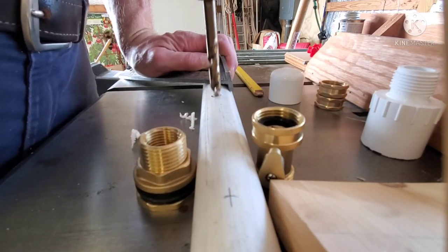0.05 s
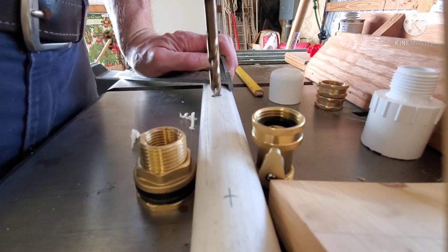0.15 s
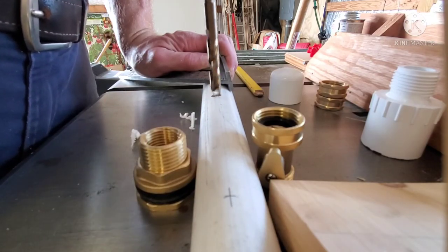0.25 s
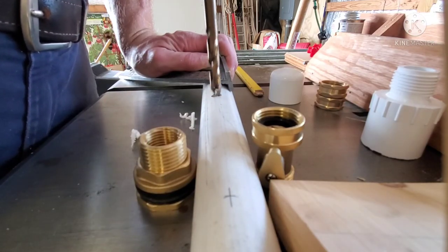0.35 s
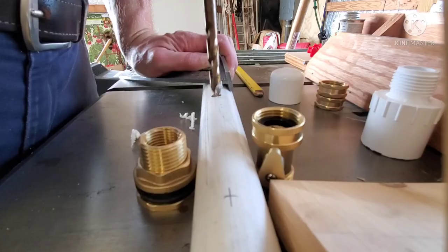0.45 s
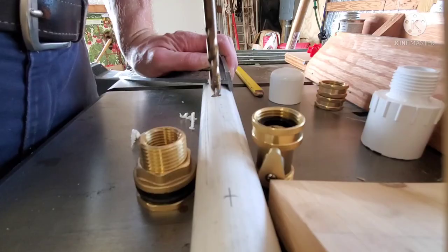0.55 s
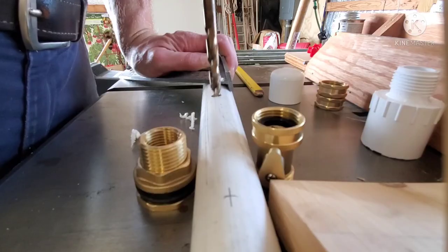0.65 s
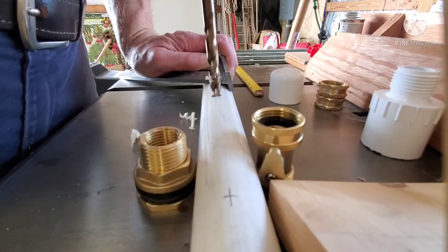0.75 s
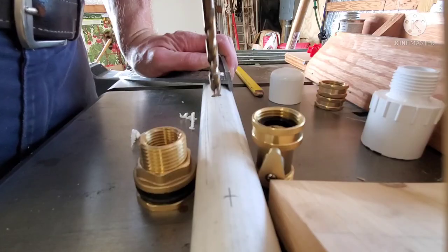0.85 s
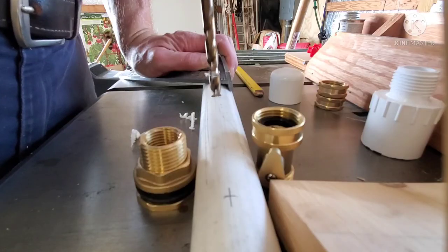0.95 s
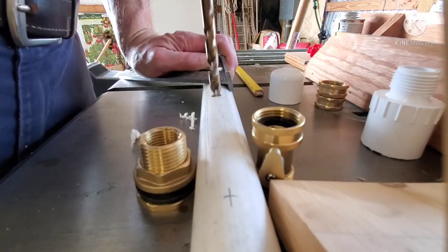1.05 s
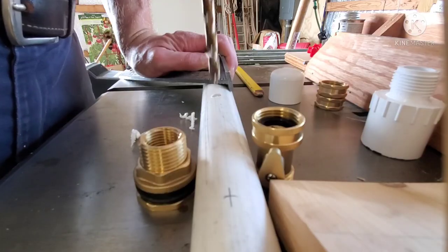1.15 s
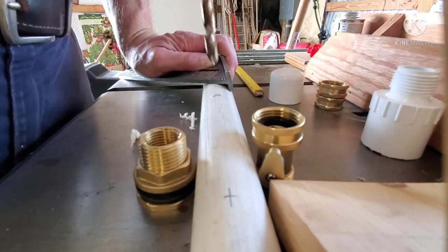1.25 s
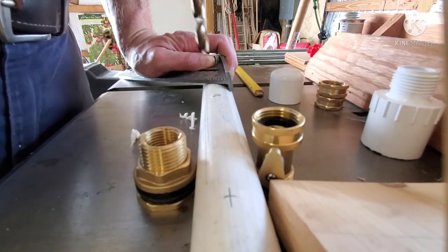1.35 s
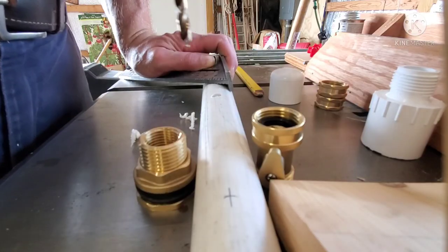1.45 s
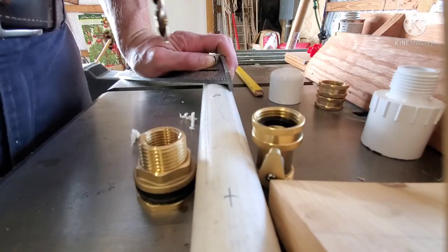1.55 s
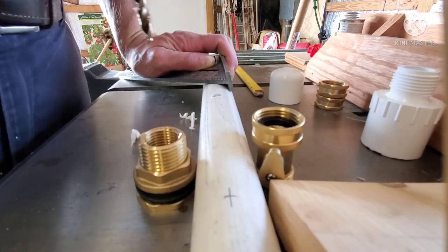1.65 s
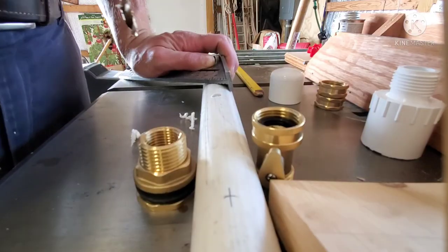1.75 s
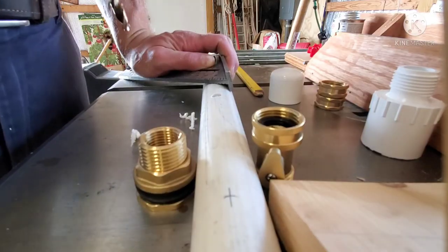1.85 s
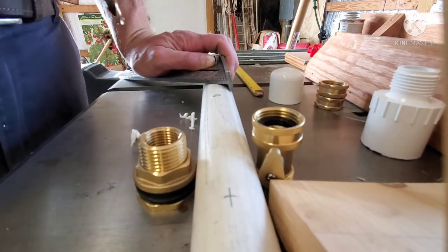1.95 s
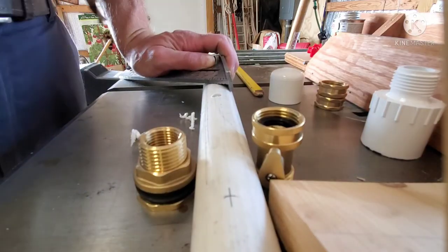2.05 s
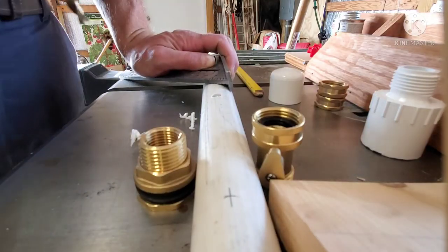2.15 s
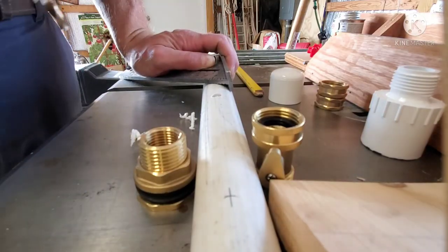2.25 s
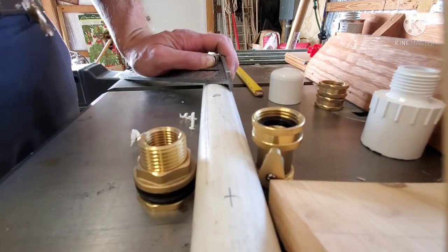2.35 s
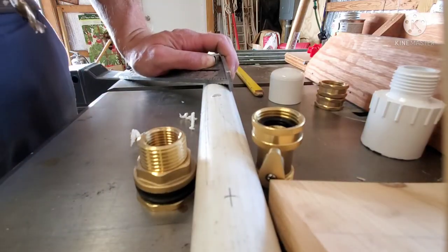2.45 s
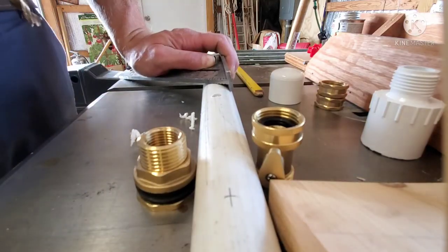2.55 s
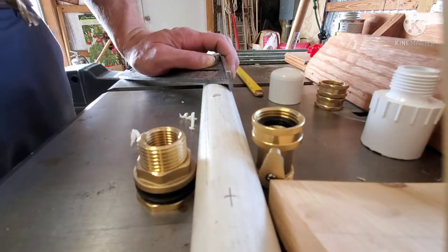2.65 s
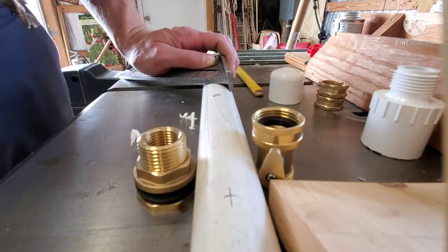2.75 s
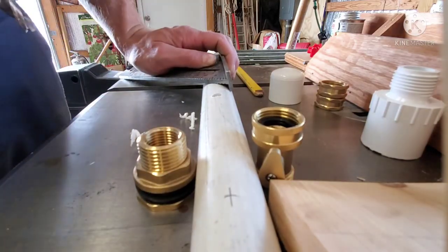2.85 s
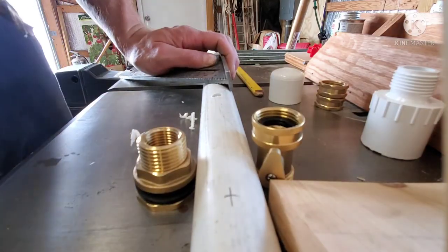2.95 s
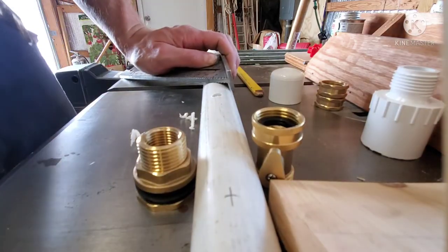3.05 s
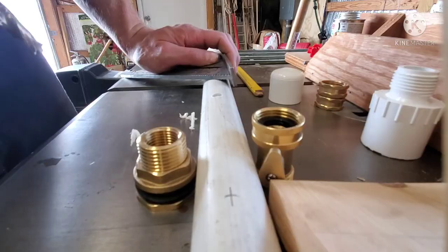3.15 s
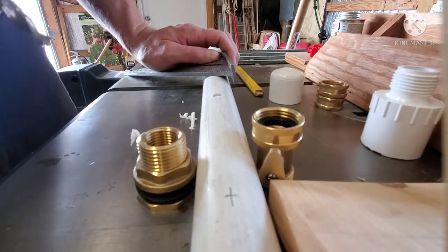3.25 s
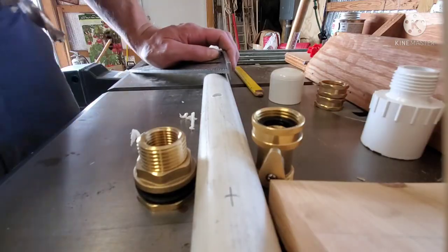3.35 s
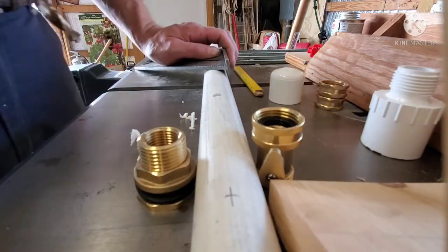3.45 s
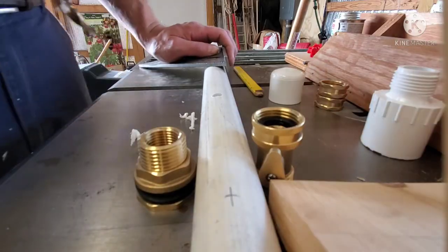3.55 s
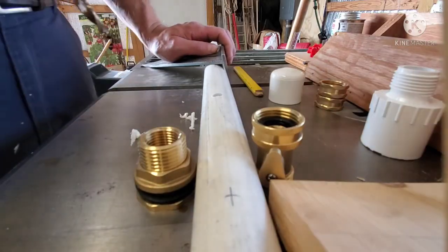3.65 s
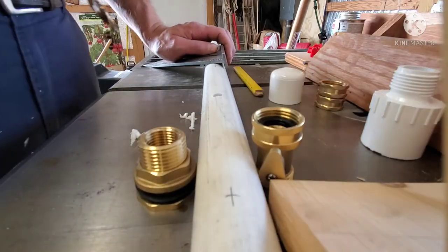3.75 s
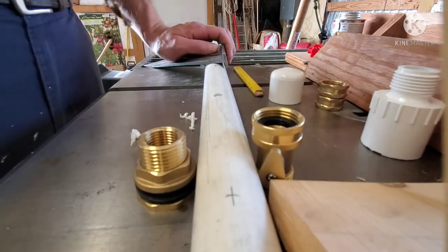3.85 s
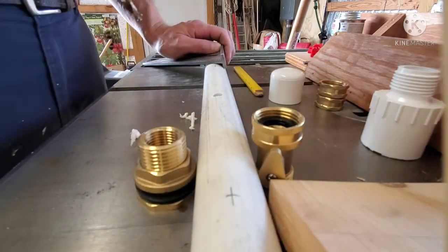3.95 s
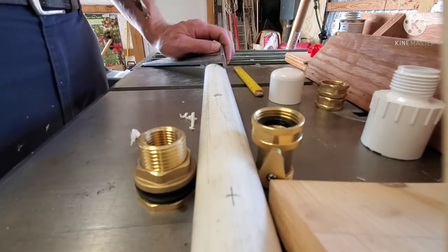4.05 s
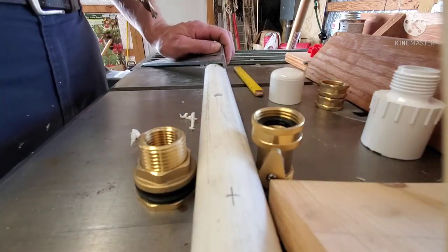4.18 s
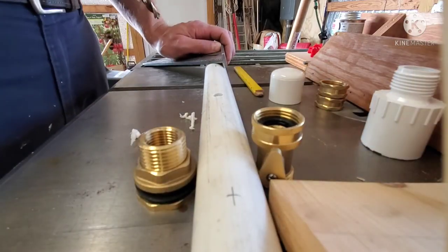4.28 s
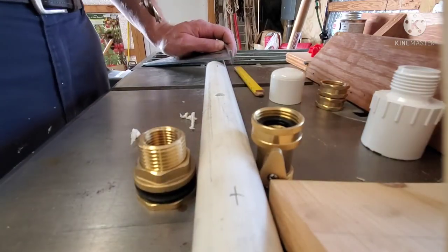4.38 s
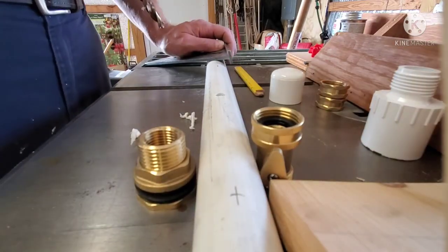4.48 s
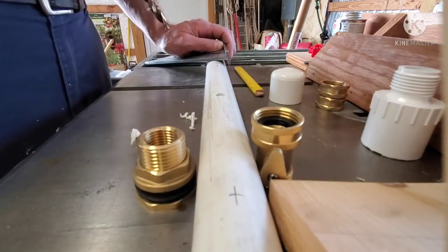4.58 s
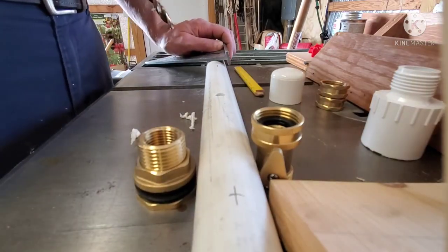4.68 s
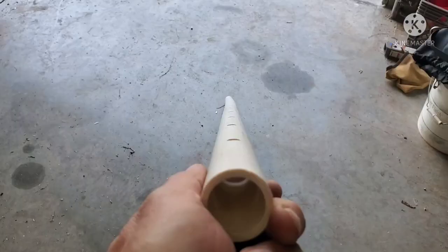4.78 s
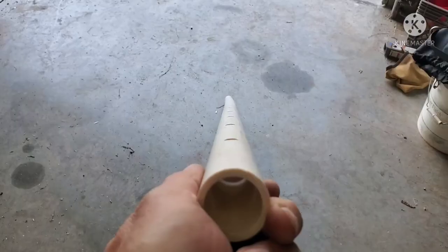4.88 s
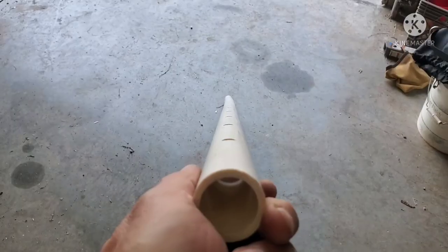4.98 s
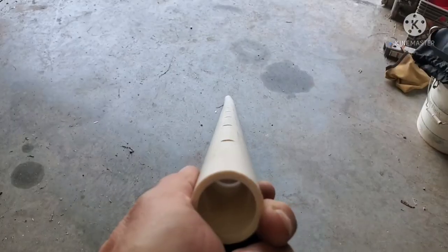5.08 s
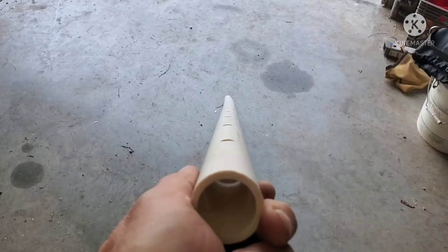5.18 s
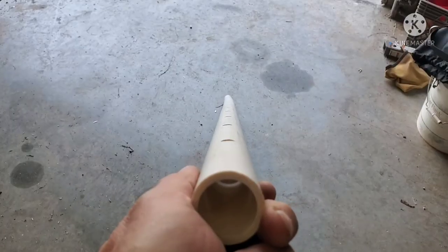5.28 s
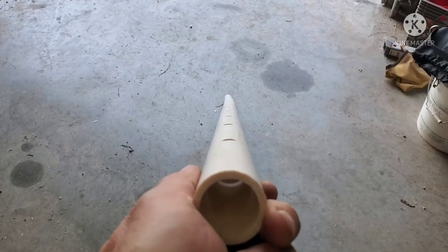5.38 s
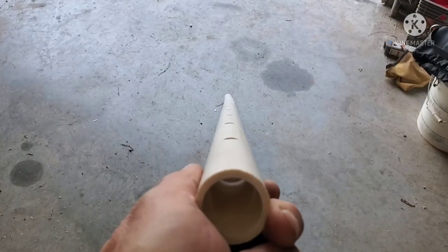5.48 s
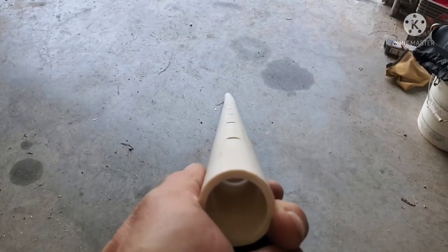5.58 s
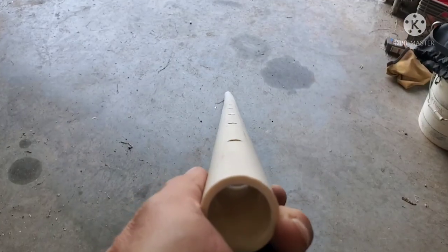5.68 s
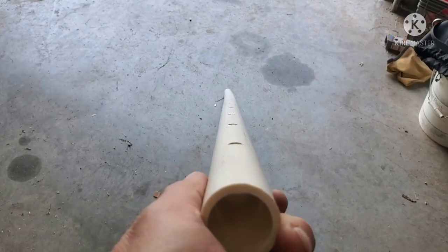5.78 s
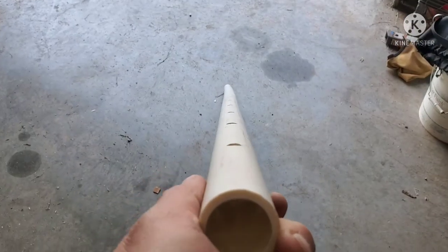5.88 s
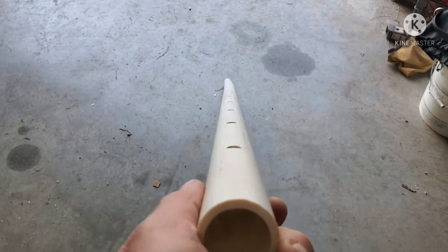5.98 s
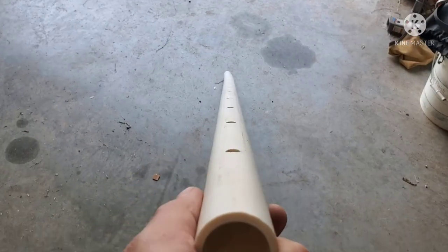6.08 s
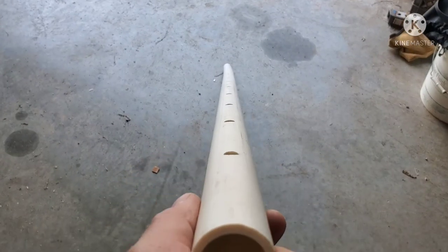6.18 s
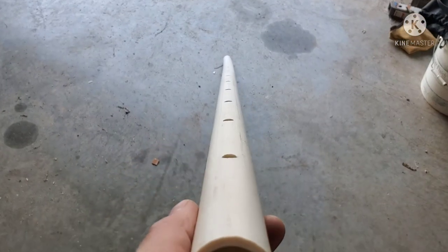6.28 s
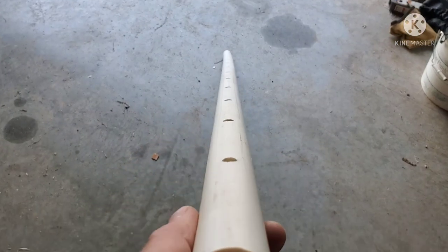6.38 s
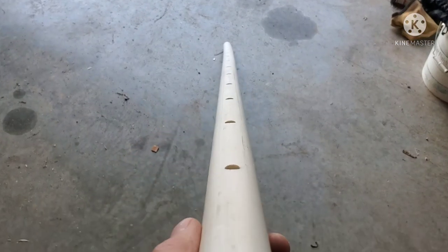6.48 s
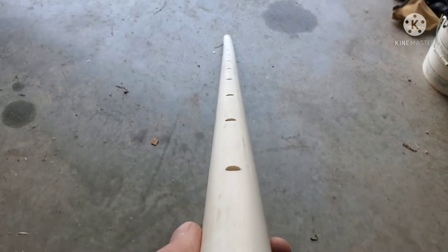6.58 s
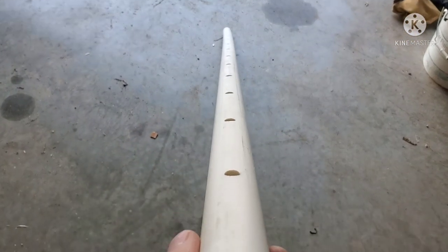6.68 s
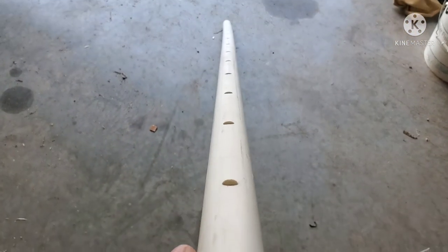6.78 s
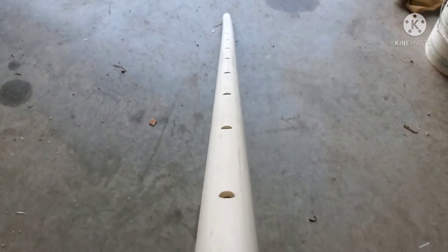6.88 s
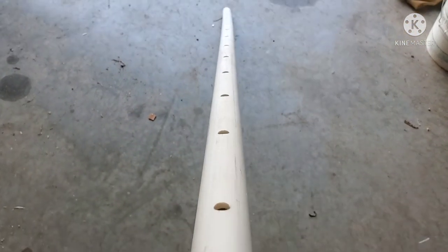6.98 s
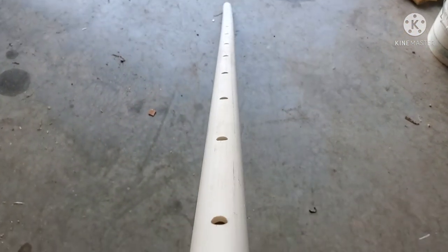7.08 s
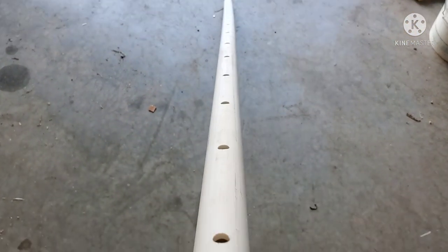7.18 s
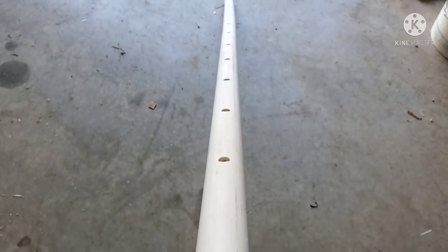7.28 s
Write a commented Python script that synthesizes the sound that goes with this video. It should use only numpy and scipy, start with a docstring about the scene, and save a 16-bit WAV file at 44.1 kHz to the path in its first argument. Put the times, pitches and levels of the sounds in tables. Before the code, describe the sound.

From the first instant a power drill is loud and close, slightly left: whining gears, rushing fan and a rough plastic rasp pulsing about ten times a second, its ringing growing as the bit digs in. Around 1.15 seconds it breaks through; the grinding vanishes and the motor runs freer and slightly higher. At 1.4 it brakes, pitch plunging, and snaps with a clack at 1.44, with short workshop reverberation. Near quiet follows: low hum, faint cloth rustle, very faint distant whistles. From 3.1 a scrape swells across the steel table, ending in a hard clack at 3.68 with metallic ringing and small rattles until 3.9. Soft knocks and hand rubs come at 4.1 to 4.65, then a cluster of hollow pipe knocks and scraping from 4.88. At 5.03 it cuts off abruptly to a quieter place: low hum, quick faint bird chirps mostly until 6.5, a barely audible bump at 6.65, and a light brush at 7.2.

```python
"""In a workshop, a hand drill bores a plastic pipe on a steel saw table, runs free and brakes with a clack.
Gear tones and fan noise follow the motor; noise pulsed once a turn of the chuck is the bit in the plastic.
A part scrapes across the table and clatters down, and the pipe is shifted with a few damped knocks.
The sounds of work break off at once, and a quieter place follows: a soft bump and brush of the pipe, a low hum.
Small birds outside whistle gliding notes, heard directly and by their echoes."""
import sys
import numpy as np
from scipy import signal
from scipy.fft import rfft, irfft, next_fast_len
from scipy.io import wavfile
from scipy.ndimage import map_coordinates

SR = 44100
rng = np.random.default_rng(int(sys.argv[2]) if len(sys.argv) > 2 else 0)


def wav_record(signal):
    """Record a signal, one row per channel, as 16-bit PCM in the file named by sys.argv[1]."""
    frames = np.transpose(np.atleast_2d(signal))
    bounded = np.clip(frames, -1, 1)
    # unit amplitude maps onto the largest positive 16-bit level
    quanta = np.round(bounded * 32767).astype(np.int16)
    wavfile.write(sys.argv[1], SR, quanta)


N = 323234
T = np.arange(N) / SR

# tones of the loaded gearbox: (multiple of shaft speed, relative level/dB at touch, the same once dug in)
GEAR_TONES = [(2, -52, -51), (4, -50, -49), (5, -64, -56), (7.5, -62, -53), (10, -57, -50.5),
              (12.5, -57, -45), (14, -55, -46.5), (15, -45, -35.5), (17.5, -57, -56), (20, -50, -45),
              (27, -53, -50), (27.5, -53, -51), (30, -37, -45.5), (32.5, -55, -51), (40, -52, -45),
              (42.5, -52, -42.5), (45, -54, -46), (47, -50, -43.5), (50, -56, -41.5), (60, -43, -40.5),
              (70, -51, -51), (80, -50, -48)]
# colour of the fan and brush noise: (f/Hz, relative density/dB)
FAN_COLOUR = [(35, -42), (60, -12.5), (102, -14.5), (135, -25.5), (167, -11), (206, -20), (343, -12.5),
              (403, -16.5), (509, -3), (559, -11.5), (889, -12.5), (1020, -3), (1290, -12.5), (1700, -0.5),
              (1910, -10.5), (2200, -3.5), (2410, -9), (3050, -9.5), (4630, -5), (5320, -12.5), (6710, -14),
              (7370, -18), (9510, -14.5), (13200, -14), (15500, -19)]
# colour of the bit shaving plastic: (f/Hz, relative density/dB)
CHIP_COLOUR = [(76, -49.5), (130, -14), (186, -3), (267, -12), (326, -9), (432, -16.5), (487, -10.5),
               (549, -17.5), (819, -7), (923, -10.5), (1220, -4.5), (1380, -10.5), (1620, -7), (1860, -12),
               (2180, -12.5), (2770, -8.5), (3600, -10), (4400, -12.5), (4860, -11), (6690, -18),
               (7540, -25), (9590, -17.5), (10400, -26), (13200, -16), (15500, -16.5)]
# resonances of drill and bit: (f/Hz, width/Hz, relative level/dB)
HOUSING_MODES = [(1260, 50, -12), (1820, 200, -9.5), (2170, 340, -8.5), (3200, 84, -6), (3464, 57, 0),
                 (3832, 120, -6.5), (4810, 160, -7), (5350, 130, -11.5), (5700, 180, -11.5),
                 (6600, 220, -9.5), (8260, 150, -18.5), (9540, 240, -18), (10300, 150, -18.5),
                 (11600, 350, -13.5), (12700, 330, -16.5), (13600, 260, -14), (14850, 230, -18.5)]
# likeness of the drill in left and right: (f/Hz, likeness -1 to 1)
DRILL_LIKENESS = [(60, 0.88), (130, -0.22), (290, -0.024), (640, -0.38), (1410, -0.44), (3100, -0.33),
                  (6820, 0.22), (15000, 0.079)]
# left-right balance of the drill: (f/Hz, left over right/dB)
DRILL_BALANCE = [(60, 1.8), (160, 5), (270, 8), (450, 2.5), (740, 2), (1220, 5), (1640, 1), (2100, 7),
                 (3300, 6), (4200, 6), (4900, 9), (6400, 11), (7600, 3), (10500, 1), (13500, 7), (15000, 6)]
# resonances of the locking chuck: (f/Hz, width/Hz, relative level/dB)
CHUCK_MODES = [(400, 260, 1), (1110, 320, 0), (2060, 290, 0), (3940, 340, -1)]
# the chuck snaps tight: (t/s, peak level/dB before panning, t60/s of the rattle)
CHUCK_SNAP = (1.4375, -12.5, 0.071)
# the bit breaks through, the trigger is let go, the chuck locks (s)
THROUGH_S, LET_GO_S, LOCK_S = 1.145, 1.38, 1.44
# gear shaft at first touch, while cutting and running free (turns a second)
START_SPEED, CUT_SPEED, FREE_SPEED = 79.6, 81.8, 86.5
# time the motor takes to settle at a new speed, and to brake (s)
SETTLE_S, BRAKE_S = .065, .078
# extra load at first touch, time to dig in, and how fast the load drops once the tip is through
TOUCH_DB, DIG_IN_S, UNLOAD_DB_PER_S = 0.5, 0.37, 216
# the bit rings more the deeper it sits
CHATTER_START_DB, CHATTER_FULL_DB, CHATTER_GROW_S = -13.5, -3, 0.65
# fan and brush noise, quieter under the brake
WHIR_FREE_DB, WHIR_LOADED_DB, WHIR_BRAKE_DB, RUN_DOWN_DB_PER_S = -28, -31, -6, 598
# gear whine, with its rise at first touch and under full braking
WHINE_FREE_DB, WHINE_LOADED_DB, WHINE_TOUCH_DB, WHINE_BRAKE_DB = -45.5, -46, 7, 11.5
# offset of the gearbox tones and depth of their flicker
GEAR_DB, GEAR_FLICKER_DB = -1.5, 3

# colour of the scrape: (f/Hz, relative density/dB)
SCRAPE_COLOUR = [(220, -47), (380, -14), (495, 0), (551, -16), (596, -5.5), (664, -11), (920, -2),
                 (1040, -13), (1290, -6.5), (1420, -13), (2090, -7.5), (2950, -10), (3660, -12),
                 (4210, -9.5), (4770, -17.5), (6400, -6), (7030, -23), (7830, -19), (9000, -28.5),
                 (9430, -15.5), (11200, -27.5), (12300, -14), (13300, -23.5), (14300, -18), (15500, -30)]
# resonances of the sliding part: (f/Hz, width/Hz, relative level/dB)
SLIDER_MODES = [(722, 24, -3), (860, 53, 1.5), (1690, 76, -3.5), (2060, 120, -2), (2440, 90, -6.5),
                (3000, 47, -4.5), (4400, 120, -10), (4970, 76, -7.5), (5720, 80, -4.5), (6350, 27, -2.5),
                (6660, 44, -2.5), (8000, 65, -14)]
# resonances of the table: (f/Hz, width/Hz, relative level/dB)
TABLE_MODES = [(197, 52, 2), (320, 64, -2), (512.5, 95, -5), (903.4, 77, -3.5), (1230, 110, -7)]
# likeness of the table in left and right: (f/Hz, likeness -1 to 1)
TABLE_LIKENESS = [(60, 0.92), (180, 0.52), (550, -.3), (1650, -0.31), (4970, 0.18), (15000, -0.3)]
# left-right balance of the table: (f/Hz, left over right/dB)
TABLE_BALANCE = [(60, 0.5), (130, 3.8), (290, 3.3), (640, 3.5), (1410, 1.6), (3100, 9.7), (6820, 4.3),
                 (15000, 6.1)]
# pushes across the table: (start t/s, end t/s, start level/dB, growth/dB per s)
PUSH_STROKES = [(3.119, 3.531, -56, 58.5), (3.522, 3.688, -21, -62.5)]
# a brief low drone of the table as the slow push ends: (start t/s, end t/s, level/dB, growth/dB per s)
DRONE_STROKE = (3.5, 3.5, -45, 7.5)
# the pipe scrapes between its knocks: (start t/s, end t/s, start level/dB, growth/dB per s)
PIPE_DRAG_STROKE = (4.877, 4.985, -59, 75)
# and shudders on the table: (start t/s, end t/s, start level/dB, growth/dB per s)
PIPE_SHUDDER_STROKE = (4.88, 4.912, -37, 60)
# stick and slip of the part and the pipe:
# (start t/s, end t/s, relative level/dB, growth/dB per s, start f/Hz, end f/Hz, left lead/rad)
STICK_SLIPS = [(3.194, 3.234, -44, -60, 170, 199.5, -0.88), (3.544, 3.686, -39.5, 17, 907, 910, 0.015),
               (3.55, 3.653, -35.5, 50, 213.9, 203.6, -0.68), (3.651, 3.683, -27.5, 0, 505.4, 512, 1.3),
               (3.69, 3.74, -38, -58.5, 209.1, 189.4, -.7), (3.705, 3.798, -36, -8, 529, 547.6, .8),
               (4.054, 4.07, -43, 0, 190, 178, -0.71), (4.893, 4.917, -33, 80, 296, 296, -0.65)]
PUSH_ATTACK_S, PUSH_T60_S, PUSH_EASE_S = .008, 0.035, 0.16  # the first push eases in
RUMBLE_DB, RUMBLE_FOLLOWS = -21, 0.54  # table rumble at full scrape level, and its dB per dB of scrape
GRIT_PER_S, GRIT_DB = 260, -6  # specks caught under the part, relative to the hiss
JUDDER_ATTACK_S, JUDDER_T60_S, JUDDER_LEFT_DB = 0.0071, 0.069, 8
JUDDER_WAVER, JUDDER_FLICKER_DB = .025, 2.5  # pitch waver as a share of pitch

# hard contacts: (t/s, strength level/dB, metal ring level/dB)
HARD_CONTACTS = [(3.529, -25, -50), (3.552, -24, -46.5), (3.562, -21.5, -48.5), (3.6775, -7.5, -21.5),
                 (3.684, -16, -30), (3.712, -11, -34), (3.749, -25.5, -38), (3.759, -20.5, -32.5),
                 (3.79, -22, -61), (3.867, -26.5, -42), (3.878, -35.5, -74)]
# colour of a clack: (f/Hz, relative density/dB)
CLACK_COLOUR = [(350, -37.5), (600, -2.5), (650, -12.5), (887, -8), (1090, -18), (2430, -2), (2680, -9),
                (4520, -20.5), (5180, -15), (8750, -42.5), (15000, -38)]
# loose metal ringing on the table: (f/Hz, width/Hz, relative level/dB)
METAL_MODES = [(513, 13, 8.5), (564, 9.4, 2.5), (1266, 8.1, 13), (1830, 35, -5.5), (1850, 9.8, -2),
               (2345, 30, -4.5), (2490, 45, -5.5), (3040, 20, -8), (3630, 40, -3.5), (3940, 49, 0.5),
               (4830, 57, -3.5), (4850, 90, -11), (5480, 55, -3), (6850, 60, -13.5), (7650, 50, -21.5)]
# low modes of the steel top: (f/Hz, width/Hz, relative level/dB)
BOOM_MODES = [(520, 22, -1), (557.4, 33, -0.5), (930.5, 60, -9.5)]
# dull knocks of the pipe: (t/s, relative level/dB, lowest f/Hz, brightness f/Hz)
PIPE_KNOCKS = [(2.872, -44, 199, 1890), (3.178, -42, 400, 2400), (3.192, -36, 50, 386),
               (3.653, -24.5, 400, 2400), (4.104, -30, 100, 1910), (4.165, -43.5, 50, 404),
               (4.463, -38, 600, 1190), (4.655, -27, 600, 1200), (4.877, -24.5, 200, 1200),
               (4.886, -30, 202, 910), (4.926, -31.5, 150, 502), (4.937, -33, 300, 2000),
               (4.951, -26.5, 200, 597), (4.963, -30, 298, 1790), (4.974, -21, 603, 3970),
               (4.983, -33, 600, 3500), (4.9788, -17, 605, 987), (4.996, -31, 400, 805),
               (5.011, -41, 500, 890)]
# resonances of the pipe, damped by the hand: (f/Hz, relative level/dB)
PIPE_MODES = [(185, 0.5), (310, 0), (530, -2), (610, -1), (725, -4.5), (903, -4), (1060, -5), (1370, -7),
              (1550, -10), (1780, -14.5), (2000, -7.5), (2450, -16), (2620, -16.5), (3200, -23),
              (4200, -16.5), (5550, -13)]
# level at full strength, and dB per dB of strength: hard hits are brighter
CRACK_DB, CRACK_GROWS = -3, 1.5
THUD_DB, THUD_GROWS = -26.5, 0.26
BOOM_DB, BOOM_GROWS, BOOM_T60_S = -23, .8, .22
PIPE_WIDTH_HZ, PIPE_WIDTH_SHARE = 50, .03  # width of a pipe mode: fixed part, and share of its pitch
KNOCK_COLOUR_DB, KNOCK_RATTLE_DB, KNOCK_T60_S = 2.5, -6, .13
KNOCK_LAG_S = .0004  # the pipe lies nearer to the left side

# colour of cloth: (f/Hz, relative density/dB)
CLOTH_COLOUR = [(180, -52.5), (300, 5), (416, -3.5), (1010, -10), (1700, -10.5), (4250, -11.5),
                (7420, -24.5), (15000, -26)]
# colour of skin on the table or pipe: (f/Hz, relative density/dB)
SKIN_COLOUR = [(240, -42.5), (400, -6.5), (502, -7.5), (630, -11.5), (921, -9), (1160, -13), (1940, -5.5),
               (2190, -9.5), (4070, -12.5), (7470, -27), (15000, -31)]
# movements of the sleeve: (peak t/s, level/dB, rise/s, fall/s); rise and fall each span 20 dB
SLEEVE_MOVES = [(1.93, -72.5, 0.21, 0.14), (2.54, -57.5, 0.18, .13), (3.14, -61, 0.81, .3)]
# a hand rubs along the table: (peak t/s, level/dB, rise/s, fall/s)
HAND_RUBS = [(4.203, -56.5, 0.072, 0.09), (4.274, -45.5, 0.059, 0.082), (4.464, -50, .17, 0.099)]
# the hand shifts on the lifted pipe: (t/s, relative level/dB, f/Hz, t60/s)
GRIP_BUMP = (6.652, -58, 170, .09)
# fingers brush the lifted pipe: (peak t/s, level/dB, rise/s, fall/s)
FINGER_BRUSH = (7.195, -67, .03, .3)

# bird notes: (start t/s, length/s, start f/Hz, middle f/Hz, end f/Hz, relative level/dB)
BIRD_NOTES = [(1.771, 0.34, 990, 1077, 1180, -72), (2.191, 0.31, 980, 1079, 1170, -73),
              (2.656, 0.3, 993, 1093, 1150, -69), (5.115, 0.023, 2744, 2920, 2850, -68),
              (5.179, .06, 3950, 4130, 3810, -60.5), (5.241, .028, 3770, 3360, 2640, -56),
              (5.367, 0.026, 3200, 3730, 3920, -64), (5.397, 0.0267, 3930, 3430, 2820, -54.5),
              (5.484, 0.023, 3270, 3630, 3970, -60), (5.522, 0.029, 3760, 3370, 3420, -57),
              (5.662, 0.037, 4750, 4780, 4750, -67), (5.69, 0.099, 4270, 4345, 4390, -66),
              (5.822, 0.049, 4350, 4320, 4390, -68.5), (5.838, 0.032, 3450, 3570, 3950, -68),
              (5.862, 0.18, 3725, 3154, 2690, -60.5), (6.224, 0.081, 2950, 2790, 2630, -65.5),
              (6.409, 0.075, 3150, 3430, 3930, -72), (7.24, 0.095, 4520, 4260, 4290, -68)]
# colour of the low hum: (f/Hz, relative density/dB)
HUM_COLOUR = [(15, -45), (25, -9.5), (50, 0), (76, 0), (108, -2.5), (119, -10), (135, -14), (170, -13),
              (220, -43.5), (370, -120)]
# colour of the room noise: (f/Hz, relative density/dB)
ROOM_COLOUR = [(88, -33.5), (150, -3), (314, -0.5), (428, -10.5), (583, -9.5), (643, -20.5), (912, -20.5),
               (3280, -22), (5230, -27), (6600, -23.5), (7270, -27.5), (10500, -28.5), (15500, -30.5)]
# steady machine tones: (f/Hz, level/dB during the work, level/dB in the quieter place)
MACHINE_TONES = [(69.7, -61.5, -67), (101.8, -65, -76.5), (332, -76.5, -88), (500, -79.5, -103),
                 (592, -87, -85.5), (814, -87, -105)]
# the table drums while things are moved on it: (peak t/s, level/dB, rise/s, fall/s)
TABLE_DRUMMING = (3.5, -49, 2.5, 5)
# decay of the workshop: (f/Hz, t60/s)
WORKSHOP_DECAY = [(150, .37), (1000, .42), (4000, .38), (14000, .32)]
# decay of the yard where the birds are: (f/Hz, t60/s)
YARD_DECAY = [(500, .7), (3000, .8), (8000, .8)]
BIRD_FLUTTER = .013  # share of pitch
BIRD_DIRECT_DB, BIRD_ECHO_DB = -4, -2.5  # the birds are far off
HUM_DB, DRILL_SHAKE_DB = -64.5, -57.5  # low hum of the shop, and what the drill adds through the table
ROOM_WORKING_DB, ROOM_QUIETER_DB = -67.5, -70
BREAK_OFF_S = 5.033  # the sounds of work break off and the quieter place follows
TOP_HZ = 15550


def amp(db):
    """Decibels to gain."""
    return 10 ** (np.asarray(db) / 20)


def unit(x):
    """Scale to rms 1."""
    return x / np.sqrt(np.mean(x ** 2) + 1e-20)


def along(points, hz):
    """Read (Hz, value) points on a log axis."""
    f, v = np.transpose(points)
    return np.interp(np.log(hz + 1), np.log(f + 1), v)


def wobble(rate):
    """A smooth random curve, rate knots a second."""
    return map_coordinates(rng.standard_normal(int(N * rate / SR) + 4), [T * rate])


def filtered(x, response):
    """x shaped by a response of frequency, with padding for the tail."""
    m = next_fast_len(x.shape[-1] + 8192)
    return irfft(rfft(x, m) * response(np.fft.rfftfreq(m, 1 / SR)), m)[..., :x.shape[-1]]


def colour(points):
    """The response of a spectrum."""
    return lambda hz: amp(along(points, hz))


def body(peaks):
    """The response of a set of resonances, alternating in sign."""
    def response(f):
        return sum((-1) ** k * amp(db) * 1j * f * w / (c * c - f * f + 1j * f * w)
                   for k, (c, w, db) in enumerate(peaks))
    return response


def noise(response, alike, left=((100, 0),), size=N):
    """Coloured stereo noise of rms 1 with a given likeness and balance of the channels."""
    def mid_side(hz):
        turn = np.arccos(np.clip(along(alike, hz), -1, 1)) / 2
        return response(hz) * np.array([np.cos(turn), np.sin(turn)])
    mid, side = filtered(rng.standard_normal((2, size)), mid_side)
    stereo = np.array([mid + side, mid - side])
    return unit(filtered(stereo, lambda hz: amp(np.outer([.5, -.5], along(left, hz)))))


def pan(left_db):
    """Gains of the two channels."""
    return amp([[left_db / 2], [-left_db / 2]])


def since(s):
    """Seconds gone by since a moment, zero before it."""
    return np.maximum(T - s, 0)


def stroke(start, end, db, db_per_s, attack_s, t60):
    """Gain of a push: a quick attack, a hold that grows or fades, a release."""
    held = np.clip(T - start, 0, end - start)
    return np.minimum(since(start) / attack_s, 1) * amp(db + db_per_s * held - 60 * since(end) / t60)


def swell(peak, db, rise_s, fall_s):
    """Gain of a soft movement that grows to a peak and dies away."""
    return amp(db - 20 * (np.maximum(peak - T, 0) / rise_s + since(peak) / fall_s))


def drill():
    """Gears whine, the fan rushes, and the bit scrapes and shakes the pipe once a turn."""
    speed, braking = motor()
    depth = np.minimum(T / DIG_IN_S, 1)
    load = amp(TOUCH_DB * (1 - depth) - UNLOAD_DB_PER_S * since(THROUGH_S))
    strain = depth * load
    whir_db = WHIR_FREE_DB + (WHIR_LOADED_DB - WHIR_FREE_DB) * strain + WHIR_BRAKE_DB * braking
    whir = running() * amp(whir_db)
    whine_db = WHINE_FREE_DB + (WHINE_LOADED_DB - WHINE_FREE_DB) * strain
    whine = running() * amp(whine_db + WHINE_TOUCH_DB * (1 - depth) + WHINE_BRAKE_DB * braking)
    chatter = amp(np.interp(T, [0, CHATTER_GROW_S], [CHATTER_START_DB, CHATTER_FULL_DB]))
    # the chuck turns at an eighth of the shaft speed
    bite = np.cos(2 * np.pi * np.cumsum(speed) / SR / 8 - .7)
    # every bite slows the motor a little
    angle = 2 * np.pi * np.cumsum(speed * (1 - .004 * load * bite + .003 * wobble(35))) / SR

    def tone(order):
        """A multiple of the shaft speed, reaching the left side first."""
        phase = rng.uniform(0, 2 * np.pi)
        return np.sqrt(2) * np.sin(order * angle + phase - np.array([[0], [order / 20]]))

    gears = sum(amp(GEAR_DB + touch_db + (deep_db - touch_db) * depth + GEAR_FLICKER_DB * wobble(28))
                * tone(order) for order, touch_db, deep_db in GEAR_TONES)
    gears = (load * gears + whine * tone(order=6)) * pan(6)
    ringing = amp(-27.0) * noise(body([(3536, 530, 0), (4080, 450, -2)]), DRILL_LIKENESS, DRILL_BALANCE)
    grit = unit(amp(1.7 * wobble(700) + 1.1 * wobble(110) + .5 * bite))
    chips = noise(lambda f: colour(CHIP_COLOUR)(f) * f ** 4 / (f ** 4 + 260 ** 4),
                  DRILL_LIKENESS, DRILL_BALANCE)
    housing = noise(body(HOUSING_MODES), DRILL_LIKENESS, DRILL_BALANCE)
    cutting = amp(-27.0) * chips + amp(-29.0) * housing
    fan = noise(colour(FAN_COLOUR), DRILL_LIKENESS, DRILL_BALANCE)
    fan = fan * (1 + 0.3 * tone(order=3) + 0.038 * tone(order=4))
    # the pipe flexes with every bite, its pitch bending under the pressure
    flex = np.sin(2 * np.pi * np.cumsum(186 + 18 * bite + 22 * wobble(60)) / SR)
    flutter = noise(body([(185, 46, 0)]), [(200, 0.66)], [(200, 9.7)])
    thrum = (amp(-44.5) * flex * pan(2.5) + amp(-43.5) * flutter) * amp(8.5 * bite - 2.5)
    return gears + load * (grit * (cutting + chatter * ringing) + thrum) + whir * fan


def motor():
    """Shaft speed and braking (0-1): settling in the cut, faster once the bit is free, then braked."""
    cutting = CUT_SPEED + (START_SPEED - CUT_SPEED) * np.exp(-T / SETTLE_S)
    freed = (FREE_SPEED - CUT_SPEED) * (1 - np.exp(-since(THROUGH_S) / SETTLE_S))
    braking = 1 - np.exp(-(since(LET_GO_S) / BRAKE_S) ** 2)
    return (cutting + freed) * (1 - braking), braking


def running():
    """Gain that is 1 until the chuck locks and then dies quickly."""
    return amp(-RUN_DOWN_DB_PER_S * since(LOCK_S))


def lock():
    """The braked chuck snaps tight: an impulse and a brief rattle ring its resonances."""
    s, db, t60 = CHUCK_SNAP
    snap = filtered(signal.unit_impulse(N, round(s * SR)), body(CHUCK_MODES))
    rattle = noise(body(CHUCK_MODES), DRILL_LIKENESS, DRILL_BALANCE)
    rattle = rattle * (T >= s) * amp(-12 - 60 * since(s) / t60)
    return amp(db) * (snap / np.abs(snap).max() * pan(4) + rattle)


def slide():
    """Friction grains and specks of grit scrape, ring the sliding part and make the table rumble."""
    hiss = noise(lambda f: colour(SCRAPE_COLOUR)(f) * f ** 4 / (f ** 4 + 450 ** 4),
                 TABLE_LIKENESS, TABLE_BALANCE)
    hiss = hiss * unit(amp(2.2 * wobble(400) + 3.6 * wobble(60)))
    specks = (rng.random(N) < GRIT_PER_S / SR) * rng.uniform(-1.2, 1, (2, N))
    grit = unit(filtered(specks, colour(SCRAPE_COLOUR)) * pan(8.6))
    ringing = noise(body(SLIDER_MODES), TABLE_LIKENESS, TABLE_BALANCE)
    scrape = unit(hiss + amp(GRIT_DB) * grit + ringing)
    rumble = noise(lambda f: body(TABLE_MODES)(f) / (1 + (f / 1300) ** 4), [(300, 0.93)], TABLE_BALANCE)
    rumble = rumble * unit(amp(1.7 * wobble(70)))
    force = np.max([stroke(*push, PUSH_ATTACK_S, PUSH_T60_S) for push in PUSH_STROKES], axis=0)
    force = force * np.minimum(since(PUSH_STROKES[0][0]) / PUSH_EASE_S, 1)
    drone_gain = stroke(*DRONE_STROKE, attack_s=.04, t60=0.17)
    shudder_gain = stroke(*PIPE_SHUDDER_STROKE, PUSH_ATTACK_S, PUSH_T60_S)
    drone = noise(body([(300, 120, 0)]), [(300, 0.81)], TABLE_BALANCE) * (drone_gain + shudder_gain)
    drag = stroke(*PIPE_DRAG_STROKE, PUSH_ATTACK_S, PUSH_T60_S)
    return (force + drag) * scrape + amp(RUMBLE_DB) * force ** RUMBLE_FOLLOWS * rumble + drone


def judders():
    """Stick and slip locks on to a resonance and groans briefly, wavering in pitch and strength."""
    out = np.zeros((2, N))
    waver = 1 + JUDDER_WAVER * wobble(90)
    flicker = amp(JUDDER_FLICKER_DB * wobble(80))
    for start, end, db, db_per_s, start_hz, end_hz, lead in STICK_SLIPS:
        hz = np.interp(T, [start, end], [start_hz, end_hz]) * waver
        slips = 2 * np.pi * np.cumsum(hz) / SR
        gain = stroke(start, end, db, db_per_s, JUDDER_ATTACK_S, JUDDER_T60_S)
        out += gain * np.sin(slips - np.array([[0], [lead]]))
    return np.sqrt(2) * out * flicker * pan(JUDDER_LEFT_DB)


def clatter():
    """Hard contacts clack, thud and boom the table and ring loose metal; harder ones crack more."""
    t = np.arange(SR // 2) / SR
    out = np.zeros((2, N + len(t)))

    def burst(response, t60, alike=TABLE_LIKENESS):
        """Decaying noise through a response."""
        return noise(response, alike, TABLE_BALANCE, size=len(t)) * amp(-60 * t / t60)

    clack_colour = colour(CLACK_COLOUR)
    for s, db, ring_db in HARD_CONTACTS:
        clack = burst(lambda f: clack_colour(f) / (1 + (f / 3000) ** 4), t60=0.029) * amp(db)
        crack = burst(lambda f: clack_colour(f) * f ** 4 / (f ** 4 + 4000 ** 4), t60=0.045)
        crack = crack * amp(CRACK_DB + CRACK_GROWS * db)
        thud = burst(lambda f: body(TABLE_MODES)(f) / (1 + (f / 900) ** 4), t60=0.17, alike=[(300, 0.57)])
        thud = thud * amp(THUD_DB + THUD_GROWS * db)
        boom = burst(lambda f: body(BOOM_MODES)(f) / (1 + (f / 1500) ** 4), BOOM_T60_S, [(500, 0.61)])
        boom = boom * amp(BOOM_DB + BOOM_GROWS * db)
        ring = burst(body(METAL_MODES), t60=.22) * amp(ring_db + 3 * wobble(70)[:len(t)])
        contact = (clack + crack + thud + boom + ring) * (1 - np.exp(-t / 0.00022))
        out[:, round(s * SR):][:, :len(t)] += contact
    return out[:, :N]


def knocks():
    """Blow and rattle ring the damped pipe in a varied mix; each knock has its own low limit and brightness."""
    t = np.arange(SR // 2) / SR
    out = np.zeros((2, N + len(t)))
    for s, db, low_hz, bright_hz in PIPE_KNOCKS:
        pipe = body([(hz, PIPE_WIDTH_HZ + PIPE_WIDTH_SHARE * hz, level + rng.normal(0, KNOCK_COLOUR_DB))
                     for hz, level in PIPE_MODES])

        def response(f):
            return pipe(f) / (1 + 1j * f / bright_hz) ** 3 * (1j * f / (1j * f + low_hz)) ** 2

        struck = filtered(signal.unit_impulse(len(t)), response)
        struck = struck / np.abs(struck).max() * pan(7.2)
        rattle = noise(response, [(300, 1.0), (2000, 0.66)], [(300, 4.3), (2000, 3)], size=len(t))
        rattle = rattle * amp(KNOCK_RATTLE_DB - 60 * t / KNOCK_T60_S)
        tick = noise(colour(SKIN_COLOUR), TABLE_LIKENESS, TABLE_BALANCE, size=len(t))
        tick = tick * amp(-12.0 - 60 * t / 0.013) * bright_hz / 2500
        knock = amp(0.5) * struck + (rattle + tick) * (1 - np.exp(-t * bright_hz))
        out[:, round(s * SR):][:, :len(t)] += amp(db) * knock
    # the right side hears the pipe later
    return filtered(out[:, :N], lambda f: np.exp(2j * np.pi * np.outer([.5, -.5], f) * KNOCK_LAG_S))


def rustles():
    """Clothes rustle as the arm moves, and the hand rubs along the table: swells of coloured noise."""
    sleeve = sum(swell(*move) for move in SLEEVE_MOVES)
    sleeve = sleeve * noise(colour(CLOTH_COLOUR), [(1000, 0.31)], [(1000, 3)])
    rub = sum(swell(*move) for move in HAND_RUBS)
    return sleeve + rub * noise(colour(SKIN_COLOUR), [(1000, 0.18)], [(1000, 5)])


def grip():
    """A soft, low bump through the held pipe as a decaying sine, then a brush of the fingers."""
    s, db, hz, t60 = GRIP_BUMP
    t = since(s)
    bump = amp(db + 6.5 - 60 * t / t60) * np.sin(2 * np.pi * hz * t)
    return bump + swell(*FINGER_BRUSH) * noise(colour(CLOTH_COLOUR), [(1000, 0.23)])


def birds():
    """Small birds whistle fluttering glides: sines on a curved pitch path."""
    out = np.zeros((2, N))
    flutter = wobble(150)
    for s, length, start_hz, middle_hz, end_hz, db in BIRD_NOTES:
        now = (T >= s) & (T < s + length)
        u = (T[now] - s) / length
        glide = np.polyval(np.polyfit([0, .5, 1], [start_hz, middle_hz, end_hz], 2), u)
        hz = glide * (1 + BIRD_FLUTTER * flutter[now])
        whistle = np.sin(2 * np.pi * np.cumsum(hz) / SR)
        out[:, now] += amp(db + 2 * flutter[now]) * np.sin(np.pi * u) * whistle
    return out


def background(working):
    """A low hum that grows with work on the table, a few machine tones and the thin noise of the room."""
    shaken = amp(DRILL_SHAKE_DB) * running() + swell(*TABLE_DRUMMING) * working
    hum = np.hypot(amp(HUM_DB), shaken) * noise(colour(HUM_COLOUR), [(40, 0.93), (150, .88)])
    tones = sum(amp(quieter_db + (working_db - quieter_db) * working + 2 * wobble(2.7))
                * np.sqrt(2) * np.sin(2 * np.pi * hz * T + .5 * wobble(4.9))
                for hz, working_db, quieter_db in MACHINE_TONES)
    room_db = ROOM_QUIETER_DB + (ROOM_WORKING_DB - ROOM_QUIETER_DB) * working
    air = noise(colour(ROOM_COLOUR), [(200, 0.52), (1500, 0.18), (8000, 0.09)])
    return hum + tones + amp(room_db) * air


def room(x, decay):
    """The answer of a space: a 5 ms gap, then a noise tail that decays at its own rate in each band."""
    hz, t, z = signal.stft(rng.standard_normal((2, SR)), SR, nperseg=256)
    tail = signal.istft(z * amp(-60 * t / along(decay, hz)[:, None]), SR, nperseg=256)[1]
    tail = np.pad(tail, ((0, 0), (SR // 200, 0)))
    return signal.fftconvolve(x, tail / np.linalg.norm(tail[0]), axes=1)[:, :N]


def scene():
    """The sounds of work break off at once, and a quieter place with the held pipe follows; birds in both."""
    tool = drill() + lock()
    handling = slide() + judders() + clatter() + knocks() + rustles()
    song = birds()
    work = tool + amp(-16.5) * room(tool, WORKSHOP_DECAY)
    work = work + handling + amp(-14.5) * room(handling, WORKSHOP_DECAY)
    working = np.clip((BREAK_OFF_S - T) / 0.025 + .5, 0, 1)  # 1 during the work, 0 in the quieter place
    outside = amp(BIRD_DIRECT_DB) * song + amp(BIRD_ECHO_DB) * room(song, YARD_DECAY)
    return work * working + grip() + outside + background(working)


def record(dry):
    """Round off the highest peaks, drop the deepest rumble and keep nothing above the band limit."""
    rounded = dry / (1 + np.abs(dry / .85) ** 6) ** (1 / 6)
    return filtered(rounded, lambda hz: hz ** 4 / (hz ** 4 + 33 ** 4) / (1 + (hz / TOP_HZ) ** 200))


dry = scene()
out = record(dry)
wav_record(out)
```